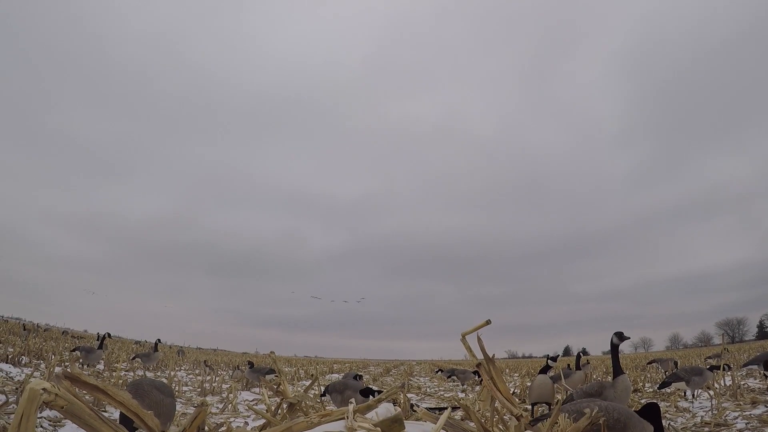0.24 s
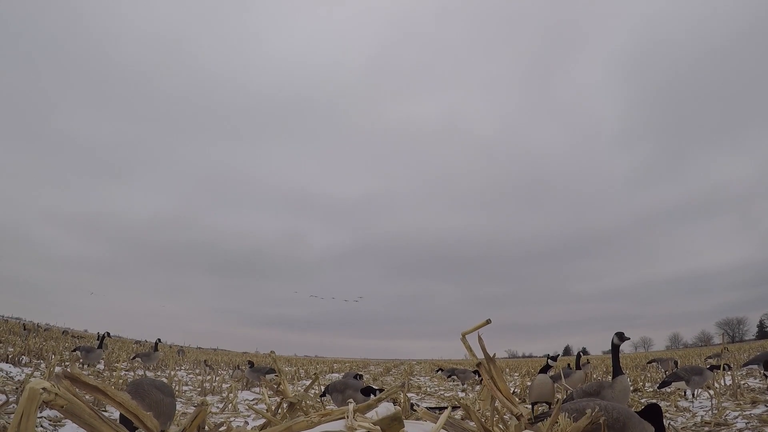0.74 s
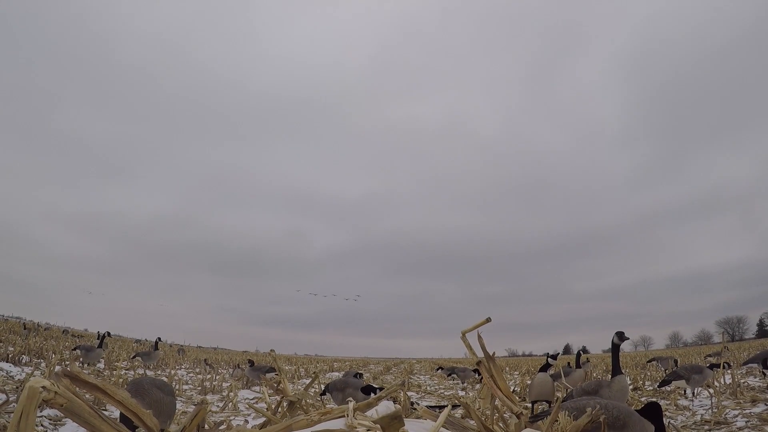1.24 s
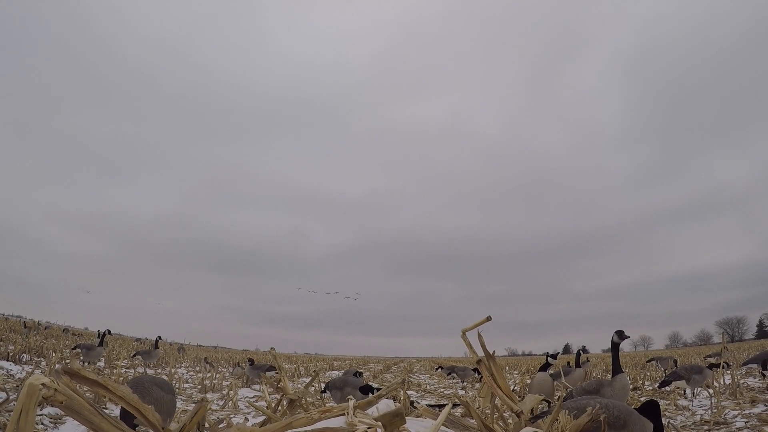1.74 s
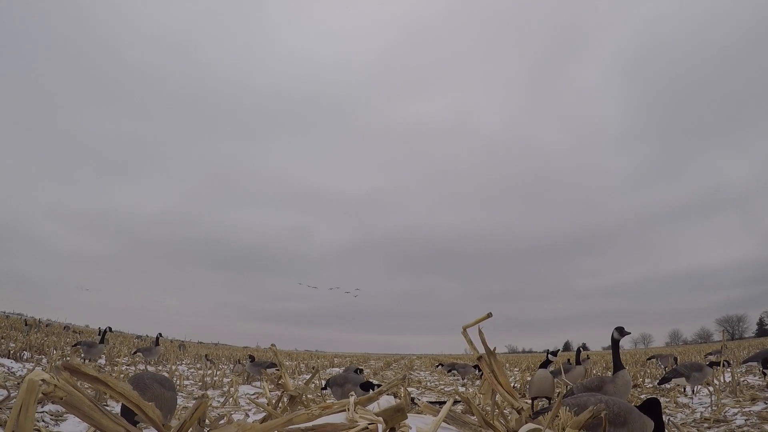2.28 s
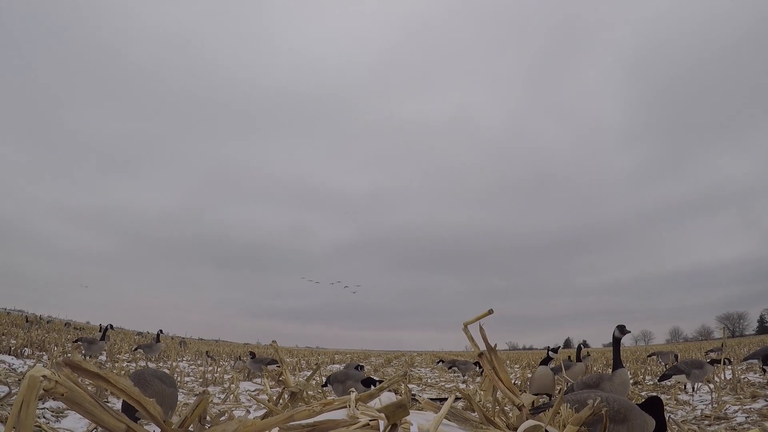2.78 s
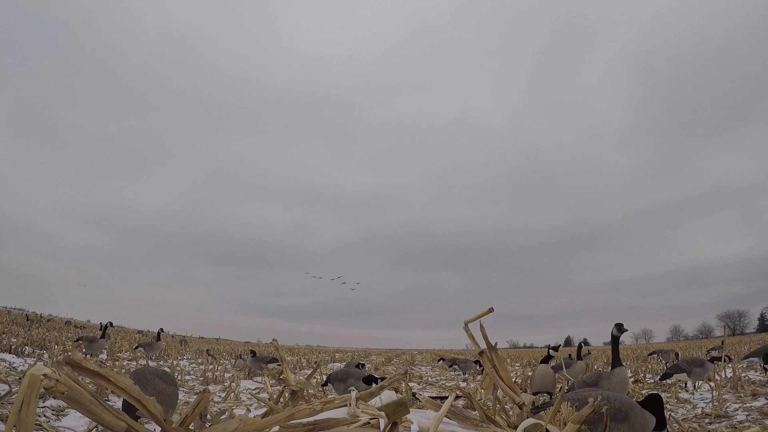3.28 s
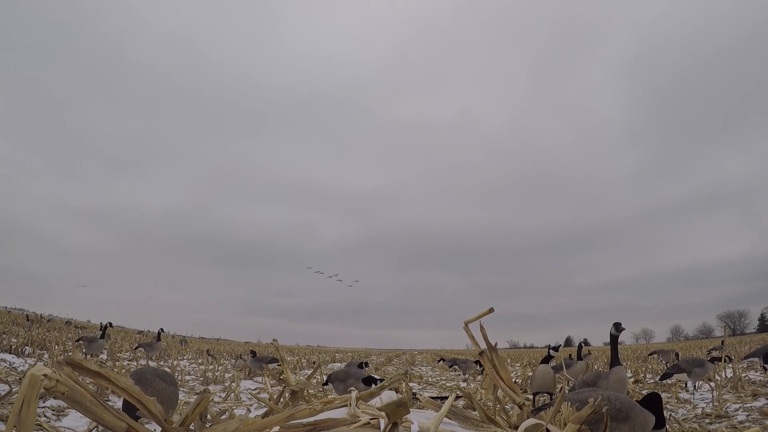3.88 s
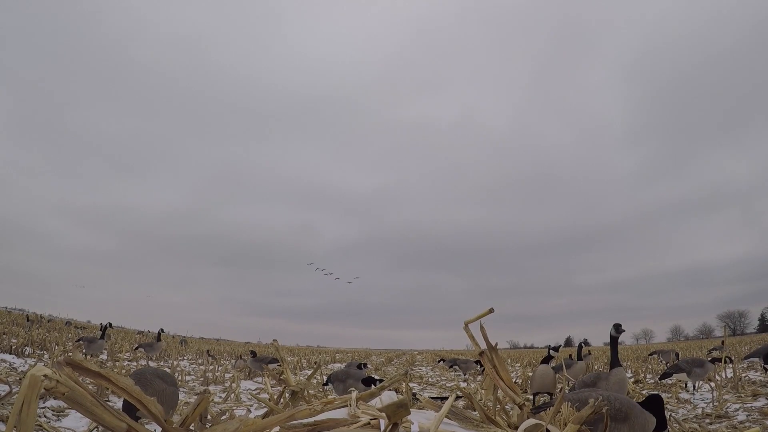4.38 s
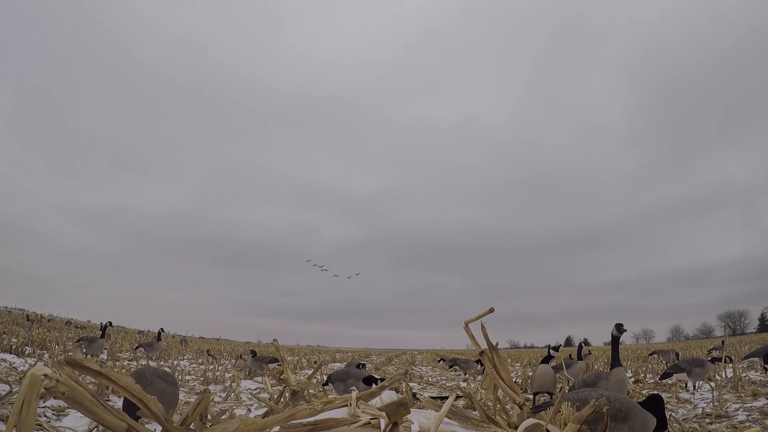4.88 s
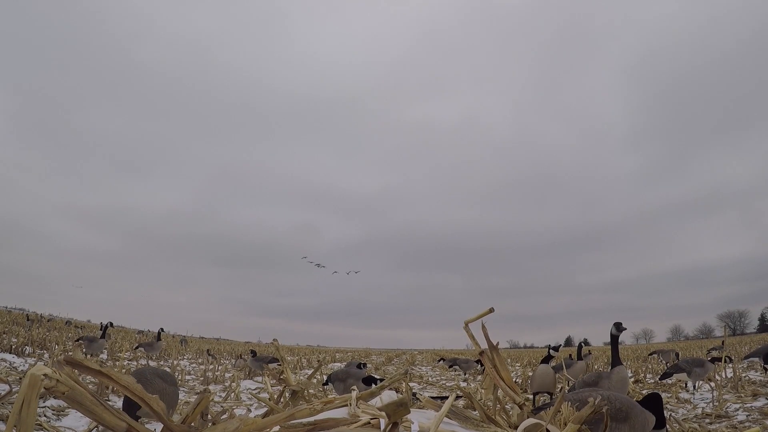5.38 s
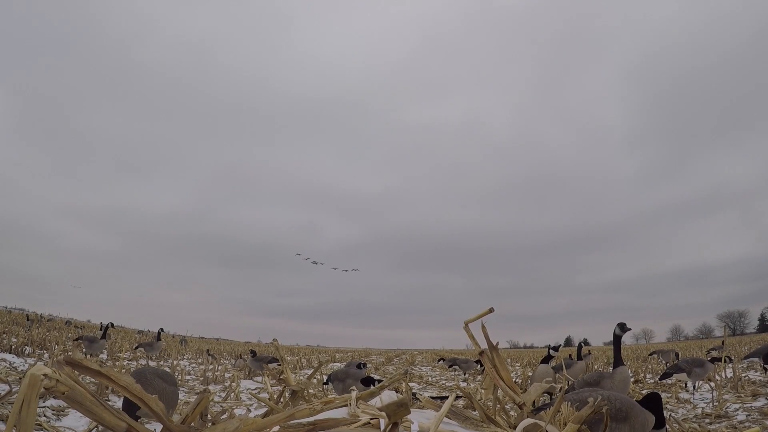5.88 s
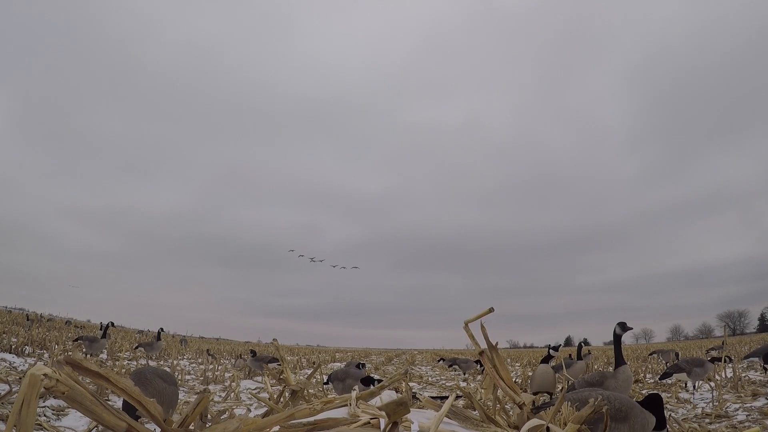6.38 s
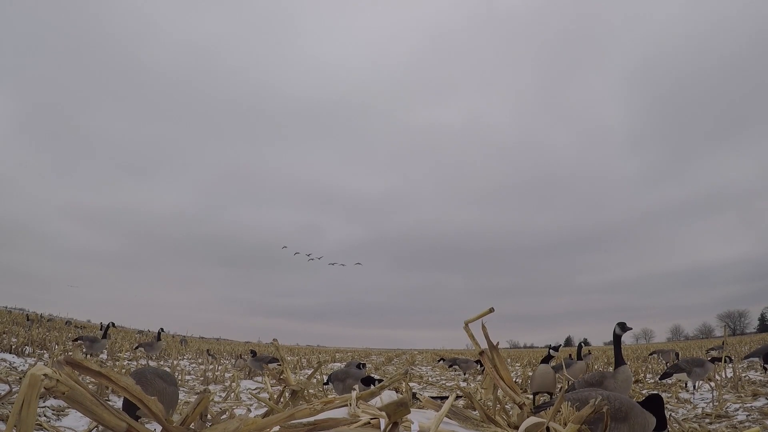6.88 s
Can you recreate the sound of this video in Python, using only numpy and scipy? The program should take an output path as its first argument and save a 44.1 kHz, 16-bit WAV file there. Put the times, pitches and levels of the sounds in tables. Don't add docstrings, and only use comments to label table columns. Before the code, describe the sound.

Gusty wind rumbles on a small microphone while two geese honk in turns across an open field, the wind swelling to a heavy roar.

```python
import sys
import numpy as np
from scipy import signal
from scipy.fft import rfft, irfft, next_fast_len
from scipy.io import wavfile
from scipy.ndimage import uniform_filter1d, map_coordinates

SR = 44100
rng = np.random.default_rng(int(sys.argv[2]) if len(sys.argv) > 2 else 0)


def transcribe(signal):
    frames = np.atleast_2d(signal).T
    limited = np.clip(frames, -1, 1)
    pcm = np.round(limited * 32767).astype(np.int16)
    wavfile.write(sys.argv[1], SR, pcm)


def rack_gain(trim_db):
    fader = np.asarray(trim_db, float)
    return 10 ** (fader / 20)


N = 314419
T = np.arange(N) / SR

# spectra [f/Hz, density/dB], each with its level/dB
PAIR_MID_NOISE, PAIR_MID_DB = [(190, -6), (330, 2.5), (375, -1), (482, -3), (801, -4.5), (867, -4),
                               (1060, -6), (1390, -8.5), (1560, -9), (2840, -15), (5520, -18), (7700, -15),
                               (14500, -26)], -47.5
PAIR_SIDE_NOISE, PAIR_SIDE_DB = [(190, -28), (330, 1.5), (406, -20), (461, -3), (594, -8), (856, -7),
                                 (927, -7.5), (4190, -33), (6980, -25), (13200, -36.5), (14700, -62)], -41.5
PORT_NOISE, PORT_DB = [(220, -29), (380, -8), (701, -6), (895, -6.5), (1420, -7.5), (2240, -13),
                       (2860, -20.5), (5700, -16.5), (7170, -17.5), (9160, -11), (11700, -18), (14700, -31)], -32.5
# [t/s, level/dB]
PAIR_FADE = [(4.25, -9), (4.45, -12), (4.6, -18.5), (4.8, -23), (4.95, -22.5), (5.02, -55)]
PORT_FADE = [(4.15, -50), (4.3, -36), (4.45, -28), (4.65, -22.5), (4.9, -22.5)]

# [f/Hz, density/dB]
PAIR_EDDIES = [(8.8, -55), (15, -6.5), (65, 4), (123, 0), (181, -9), (238, -14), (476, -37.5), (625, -40),
               (700, -47), (910, -60), (1540, -120)]
PORT_EDDIES = [(8.8, -63), (15, -4.5), (38, 1.5), (83, -4), (141, -13.5), (213, -21.5), (454, -45.5),
               (529, -49.5), (650, -55.5), (900, -57), (1170, -82.5), (1980, -120)]
# [t/s, rumble level/dB, left minus right/dB]
PAIR_WIND = [(0.0, -31, 0), (.1, -40, 0.5), (0.55, -31.5, 7.5), (0.82, -37, 2.5), (1.25, -30, -3),
             (1.41, -36.5, 2.5), (2.52, -40.5, 0.5), (4.26, -34, 8.0), (4.4, -25, 6)]
# [t/s, rumble level/dB, bite over rumble/dB]
PORT_WIND = [(4.2, -32, -12), (4.63, -16, -17), (5.19, -15, -19), (5.41, -19.5, -12.5),
             (5.52, -16.5, -34.5), (6.07, -17.5, -16), (6.24, -15.5, -27.5), (6.58, -16.5, -19),
             (7.13, -16, -20.5)]
# [t/s, level/dB, length/s, left minus right/dB]
PUFFS = [(0.163, -33.0, 0.04, 9.0), (0.224, -32.5, 0.048, 0.0), (0.267, -33.0, 0.033, 1.0),
         (0.33, -31.5, 0.035, 4.0), (0.386, -25.0, 0.05, 12.0), (0.43, -26.0, 0.038, 7.0),
         (0.515, -32.0, 0.0416, 3.0), (0.599, -22.0, 0.052, 9.0), (0.747, -24.5, 0.099, 9.0),
         (0.892, -26.0, 0.043, 12.0), (0.999, -25.5, 0.055, 8.0), (1.115, -22.5, 0.078, 8.0),
         (1.199, -24.5, 0.052, -3.0), (1.268, -25.0, 0.03, 2.0), (1.395, -21.5, 0.064, 12.0),
         (1.546, -29.0, 0.039, 11.0), (1.656, -28.5, 0.1, 14.0), (1.823, -26.5, 0.05, 11.0),
         (1.883, -29.5, 0.035, 7.0), (1.988, -34.5, 0.069, 3.0), (2.053, -34.0, 0.037, 9.5),
         (2.139, -33.5, 0.04, 6.0), (2.237, -34.5, 0.043, 10.0), (2.317, -32.5, 0.1, 8.0),
         (2.586, -32, 0.048, 6.0), (2.729, -30.0, 0.075, -1.0), (2.813, -28.5, 0.05, 12.0),
         (2.908, -33.5, 0.049, 4.0), (3.03, -29.5, 0.11, 10.0), (3.139, -38.0, 0.035, 11.5),
         (3.213, -37.0, 0.049, -0.5), (3.28, -37.5, 0.032, 6), (3.364, -26.5, 0.052, 18.0),
         (3.446, -31.0, 0.031, 12), (3.574, -33, 0.12, 6.0), (3.664, -33, 0.059, 16.0),
         (3.817, -35, 0.048, 6.0), (3.932, -29.5, 0.099, 8), (4.016, -29.0, 0.091, 12.5),
         (4.119, -30, 0.033, 2)]
# [t/s, level/dB, length/s, left minus right/dB]
PUFF_BITES = [(0.049, -42.5, 0.028, 10.0), (0.168, -41.5, 0.035, 9.0), (0.306, -35.0, 0.048, 8.0),
              (0.374, -30.5, 0.027, 15.0), (0.421, -30.5, 0.02, 13.0), (0.459, -28.5, 0.04, 12.0),
              (0.507, -29.0, 0.031, 13.0), (0.596, -27.0, 0.0897, 18.0), (0.698, -28.0, 0.031, 11.0),
              (0.759, -23.5, 0.032, 12.0), (0.882, -35.0, 0.058, 12.0), (1.004, -30.5, 0.04, 8.0),
              (1.048, -25.5, 0.031, 14.0), (1.103, -27.0, 0.039, 6.0), (1.23, -25.5, 0.03, -6.0),
              (1.392, -28.5, 0.038, 10.0), (1.499, -41.5, 0.027, 12.0), (1.564, -37.0, 0.033, 4.0),
              (1.613, -35.0, 0.034, 6.0), (1.775, -39.5, 0.028, 13.0), (1.824, -37.0, 0.033, 15.0),
              (1.885, -40.5, 0.067, 3.0), (1.989, -38.0, 0.03, 12.5), (2.08, -46.0, 0.045, -8.0),
              (2.145, -47.5, 0.026, 3.5), (2.228, -48, 0.025, 3.0), (2.309, -41.0, 0.056, 9.0),
              (2.369, -46.5, 0.026, 3.0), (2.498, -45.0, 0.053, -2.5), (2.62, -45.0, 0.033, -3.0),
              (2.744, -35.0, 0.08, 5.0), (2.844, -42.0, 0.039, 12), (2.897, -46, 0.022, -7.0),
              (2.97, -32.0, 0.023, -13.5), (3.034, -37.5, 0.03, 13.5), (3.39, -36, 0.068, 5.0),
              (3.448, -39, 0.028, 8.5), (3.506, -38.5, 0.029, 5.0), (3.566, -42.0, 0.054, 4.0),
              (3.748, -45.5, 0.028, 3.5), (3.891, -32.0, 0.039, -5.5), (4.003, -36, 0.031, 16.5),
              (4.091, -41.5, 0.033, 0.5), (4.156, -37.5, 0.033, 7.5), (4.289, -29, 0.025, 4)]
# [t/s, level/dB, length/s]
BLASTS = [(4.393, -16.0, 0.043), (4.459, -15.5, 0.059), (4.557, -16.0, 0.036), (4.633, -12.0, 0.054),
          (4.783, -11.0, 0.085), (4.88, -12.5, 0.033), (4.929, -13, 0.026), (4.992, -13, 0.091),
          (5.161, -11.0, 0.07), (5.264, -13.5, 0.03), (5.305, -13.5, 0.027), (5.37, -12.0, 0.071),
          (5.465, -21.5, 0.029), (5.522, -21.5, 0.025), (5.592, -16.0, 0.052), (5.753, -15, 0.042),
          (5.853, -22.5, 0.023), (5.904, -19.5, 0.023), (6.006, -12.5, 0.067), (6.118, -11.0, 0.047),
          (6.188, -11, 0.0595), (6.289, -11.0, 0.047), (6.39, -11.5, 0.074), (6.535, -9, 0.044),
          (6.611, -13.5, 0.027), (6.648, -13.0, 0.032), (6.705, -11.0, 0.14), (6.803, -16, 0.019),
          (6.9, -11.5, 0.11), (7, -13, 0.024), (7.085, -11.5, 0.076)]
# [t/s, level/dB, length/s]
BLAST_BITES = [(4.402, -24.0, 0.041), (4.457, -33.0, 0.027), (4.536, -31.0, 0.028), (4.575, -30, 0.02),
               (4.618, -26.5, 0.018), (4.655, -20.5, 0.027), (4.776, -24.0, 0.022), (4.823, -20.0, 0.062),
               (4.908, -30, 0.035), (4.966, -21, 0.021), (4.996, -22, 0.02), (5.035, -19.5, 0.045),
               (5.117, -21.5, 0.024), (5.127, -24.5, 0.025), (5.181, -24.5, 0.066), (5.314, -25, 0.022),
               (5.341, -24.5, 0.059), (5.38, -25.5, 0.024), (5.434, -23.5, 0.028), (5.493, -48.5, 0.023),
               (5.522, -46.5, 0.021), (5.6, -38.5, 0.017), (5.634, -37.0, 0.021), (5.669, -33, 0.024),
               (5.746, -30.5, 0.028), (5.861, -37, 0.022), (5.938, -32.5, 0.03), (6, -22.0, 0.023),
               (6.039, -19.5, 0.037), (6.125, -22.5, 0.02414), (6.202, -21.5, 0.024), (6.292, -27.5, 0.03),
               (6.408, -24, 0.026), (6.532, -18, 0.031), (6.578, -27.5, 0.017), (6.607, -28, 0.024),
               (6.657, -30, 0.022), (6.706, -22.0, 0.048), (6.781, -24, 0.052), (6.896, -25.5, 0.048),
               (6.935, -25, 0.023), (6.992, -19.5, 0.026), (7.059, -23.5, 0.043), (7.106, -25.5, 0.024)]
BREEZE_DB, BREEZE_BITE_DB, GALE_DB, GALE_BITE_DB = -3.5, -14, -2.5, -1.5
BELL, BITE_BELL = .45, .48
BITE_HZ = 148.2

# [t/s, peak level/dB, left minus right/dB, width/ms]
THUMPS = [(0.698, -27, 12, 0.81), (0.716, -26.5, 19, 0.48), (0.754, -26, 21, 0.38),
          (0.908, -37, -16.5, 0.44), (0.978, -32.5, 23, 0.51), (1.038, -30, 18.5, 0.44),
          (1.077, -32, -24, 0.49), (1.203, -27, -16, 0.36), (1.227, -31, -28, 0.57),
          (1.377, -40, -18.5, 0.43), (2.719, -43, 2, 0.18), (2.961, -33, -18, 0.4),
          (4.527, -23.5, -1, 0.27), (4.636, -26, 5, 0.27), (4.651, -17, 3.5, 0.43), (4.675, -30, 6, 0.32),
          (4.756, -23, 2, 0.37), (4.778, -13, 0.5, 0.37), (4.812, -12, -0.5, 0.28), (4.826, -15, 2, 0.29),
          (4.964, -28, 0.5, 0.19), (5.111, -23.5, 0.0, 0.31), (6.027, -26, 0.0, 0.48),
          (6.135, -27.5, -1, 0.35), (6.4, -34, -0.5, 0.56), (6.533, -24, 0, 0.25), (6.684, -24, -3, 0.34),
          (6.706, -20.5, -0.5, 0.36), (6.733, -21, -0.5, 0.37), (6.756, -23, 0, 0.34),
          (6.886, -32.5, 0.0, 0.33), (6.901, -25, 0, 0.35), (6.935, -24.5, 0, 0.31), (6.986, -31, -1, 0.35)]
# [t/s, peak level/dB, f/Hz, left minus right/dB]
TICKS = [(0.2733, -53, 7430, -1.5), (1.44, -49, 7390, -19.5), (1.672, -52.5, 7020, -5),
         (1.688, -41, 1197, -1), (2.0753, -50.5, 7310, -18), (2.1784, -51, 7770, -23),
         (2.369, -50.5, 7330, -9), (2.4298, -50, 7300, -8), (3.214, -50, 7300, -13.5),
         (4.6987, -47, 6307, 0.0), (4.805, -47, 2803, 2)]
SMEAR_DB, SMEAR_S = -9.5, 0.012

# [start t/s, flip t/s, note f/Hz, groan level/dB, note level/dB]
RIGHT_CALLS = [(0.292, 0.352, 711, -23.5, -32), (3.351, 3.403, 670, -22, -33),
               (3.848, 3.909, 664, -23.5, -33), (4.371, 4.419, 669.5, -26, -40),
               (6.634, 6.682, 611, -28.5, -37)]
RIGHT_NOTE_S = [0.069, 0.056, .063, 0.051, 0.03105]
RIGHT_HARMONICS = [15, 4, -3.5, -28, -33, -23.5, -50, -35, -26]

# [t/s of the lock, groan length/s,
# note length/s, level/dB, growl f/Hz, a quarter of the note]
AHEAD_CALLS = [(0.145, 0.021, 0.047, -66, 184), (0.407, 0.0065, 0.078, -54.5, 207.6),
               (.488, 0.021, 0.061, -48, 193.5), (1.089, 0.069, 0.049, -50, 192),
               (1.478, 0.082, 0.058, -53, 214), (1.835, 0.062, 0.1, -47.5, 199.1),
               (2.105, 0.047, 0.19, -62, 190), (2.55, 0.14, 0.035, -55, 193.2),
               (2.795, 0.071, 0.049, -50, 201.9), (3.263, 0.074, 0.07, -44.5, 201.7),
               (3.801, 0.12, 0.07, -45.5, 199.5), (4.035, 0.074, 0.066, -52, 204.2),
               (4.389, 0.11, 0.079, -45.5, 201.6), (4.763, 0.041, 0.087, -49, 198.6),
               (5.075, 0.032, 0.078, -51, 199), (5.14, 0.0065, 0.059, -54, 181),
               (5.624, 0.074, 0.07, -49, 197.2), (6.356, 0.017, 0.049, -54.5, 203.9),
               (6.71, .025, 0.0755, -51, 199.2)]
# [growl left in the note 0-1, treble over level/dB, low ring/dB, top ring/dB]
VOICE = [(.1, -26, -18, -20), (0.8, -13, -1.5, -22), (0.5, -15.5, -7.5, -9), (1, -14.5, -2.5, -5),
         (0.59, -23, -7.5, -6), (0.64, -12, -7.5, -5.5), (0.12, -26, -14.5, -20), (0.99, -20, -3, 0),
         (1, -11.5, -6, -9), (0.69, -8, -10.5, 5.5), (0.76, -15, -8, -4), (0.78, -18, -1, -6),
         (0.15, -13, -4, 0), (1, -2, 0, -5), (1, -4, -2.5, -2), (0.8, -5, -24, -6), (0.96, -7.5, -2.5, -3),
         (1, -8, -1.5, -12), (1, -6.5, 1.5, -5)]
# [groan over usual/dB, sag over usual/1, growl lost midway/1, throat size/1]
PHRASE = [(-1, .3, .01, 1.07), (5, 1.84, .01, 1.01), (3.5, 0.92, .01, 1.036), (-2.5, 0.773, .01, 1.02),
          (3.5, 1.51, 0.75, 0.995), (-3, .8, .01, 1.02), (2.5, 0.93, .01, 1.05), (0.5, 1.4, .01, 1.03),
          (-0.5, 1.63, 0.095, 1.02), (0, 0.944, 0.087, 1.036), (-4, 1.22, 0.091, 1.01),
          (-0.5, 1.372, 0.099, 1.005), (-2, 0.85, 0.45, 1.06), (0, 0.7, 1, 1.006), (1, 1.32, 0.59, 1.02),
          (0, 1.5, 0.099, 1.02), (-1, 1.2, 0.26, 1), (0.5, 1.34, .1, 1.007), (2, 1.03, 0.19, 1.026)]
UPPER_DB = [-10, -6, -3, 2, 0.5, -4, -6, -10.5, -11, 1.5, -1, -5, -3, -6.5, 2, -1, 2, -4, 11.5]
GROAN_DROP = [.05, 0.058, 0.089, 0.0306, 0.0494, .11, 0.1014, .09, 0.0302, 0.1, 0.08, .04, .12, .08, .08,
              .05, .1, 0.0813, 0.0798]
# [f/Hz, width/Hz, level/dB]
THROAT = [(1530, 273, 5.5), (2282, 220, -8.5)]
WINDPIPE = [(626, 640, -7), (803, 230, 8.5)]
BILL = [(2900, 1794, -7), (4242, 800, 2)]
BILL_TIP = [(5940, 1650, 0)]
RASP = [(1460, 700, -1)]
GROAN_START_DB, GROAN_END_DB = -15, -2.5
GROAN_CLIMB, NOTE_RISE = .05, 0.01394
NOTE_SAG, SAG_CURVE = 0.119, 2.88
RELEASE_DB, RELEASE_CURVE = -12.5, 3.1
DRIFT_PER_S = 0.245
SWELL_DB, SWELL_SHARE = -1, 0.24
GROAN_THROAT, NOTE_THROAT, THROAT_LAG = 0.72, 0.919, 0.048
TAIL_S = 0.0072


def curve(table):
    s, *columns = np.transpose(table)
    return [np.interp(T, s, c) for c in columns]


def ramp(t, at, length):
    return np.sin(np.pi / 2 * np.clip((t - at) / length, 0, 1)) ** 2


def pan(x, db):
    return np.outer(rack_gain([db / 2, -db / 2]), x)


def walk(rate, size=N):
    k = max(int(SR / rate), 1)
    held = 1.3 * np.repeat(rng.standard_normal(size // k + 1), k)
    return uniform_filter1d(uniform_filter1d(held, k), k)[:size]


def coloured(spectrum, size=N):
    hz, db = np.transpose(spectrum)
    n = 2 * next_fast_len(size // 2 + 1)
    log_f = np.log(np.arange(1, n // 2 + 2) * SR / n)
    gain = rack_gain(np.interp(log_f, np.log(hz), db, -120, -120))
    x = irfft(rfft(rng.standard_normal(n)) * gain, n)[:size]
    return x / x.std()


def even(x, seconds):
    k = int(seconds * SR)
    power = uniform_filter1d(uniform_filter1d(x ** 2, size=k), size=k)
    x = x / power ** .45
    return x / x.std()


def rings(hz, modes):
    return sum((-1) ** k * rack_gain(db) / (1 + 2j * (hz - f) / w) ** 2 for k, (f, w, db) in enumerate(modes))


def field_noise():
    swell = rack_gain(.3 * walk(2))
    mid = rack_gain(PAIR_MID_DB) * coloured(PAIR_MID_NOISE)
    side = rack_gain(PAIR_SIDE_DB) * coloured(PAIR_SIDE_NOISE)
    return swell * np.array([rack_gain(-1.0) * (mid + side), mid - side])


def gusting(db, pan_db, gusts, bell):
    def split(db, pan_db):
        return rack_gain(2 * db) / (1 + rack_gain(np.multiply.outer([-2, 2], pan_db)))

    power = split(db, pan_db)
    for s, gust_db, length, *gust_pan_db in gusts:
        span = slice(max(int((s - 2 * length) * SR), 0), int((s + 2 * length) * SR))
        shape = np.exp(-((T[span] - s) / (bell * length)) ** 2)
        power[:, span] += np.outer(split(gust_db, sum(gust_pan_db)), shape)
    return 10 * np.log10(power)


def wind(spectrum, db, bite_db, usual_db, gusty):
    extra_bite = np.minimum(bite_db - db - usual_db, 9)
    speed = np.clip(2 ** (extra_bite / 45 + gusty * walk(30)), .5, 2)
    row = map_coordinates(coloured(spectrum, size=2 * N), [np.cumsum(speed)], order=1)
    big = signal.sosfilt(signal.butter(4, BITE_HZ, "low", fs=SR, output="sos"), row)
    small = signal.sosfilt(signal.butter(4, BITE_HZ, "high", fs=SR, output="sos"), row)
    return rack_gain(db) * even(big, 0.038) + rack_gain(bite_db) * even(small, 0.015)


def breeze_on_pair():
    db, pan_db = curve(PAIR_WIND)
    rumbles = gusting(db + BREEZE_DB, pan_db, PUFFS, BELL)
    bites = gusting(db + BREEZE_BITE_DB, pan_db, PUFF_BITES, BITE_BELL)
    gusts = np.array([wind(PAIR_EDDIES, rumble_db + 11.0, bite_db + 8.5, -9.5, gusty=.12)
                      for rumble_db, bite_db in zip(rumbles, bites)])
    return gusts - 0.0047 * np.roll(gusts[::-1], 11, axis=1)


def gale_on_port():
    db, bite_db = curve(PORT_WIND)
    bite_db = gusting(db + bite_db + GALE_BITE_DB, 0 * T, BLAST_BITES, BITE_BELL)[0]
    db = gusting(db + GALE_DB, 0 * T, BLASTS, BELL)[0]
    return wind(PORT_EDDIES, db + 3.0, bite_db + 1.12, -14.5, gusty=.1) * ramp(T, 4.2, 0.066)


def thumps():
    out = np.zeros((2, N))
    for (s, db, pan_db, ms), turn in zip(THUMPS, 2 * np.pi * rng.random(len(THUMPS))):
        u = np.arange(-600, 600) / SR / (ms / 1000)
        swings = 1.25 if s < PAIR_FADE[0][0] else 1.8
        pulse = np.cos(0.5 * u + turn) * np.exp(-(u / swings) ** 2 / 4)
        at = int((s + 0.00397) * SR)
        out[:, at - 600:at + 600] += pan(rack_gain(db + 4.0) * pulse, pan_db)
    return out


def stalks():
    out, t = np.zeros((2, N)), T[:300]
    for s, db, hz, pan_db in TICKS:
        at = int(s * SR)
        ring = np.exp(-t / 0.00059) * np.sin(2 * np.pi * hz * t)
        out[:, at:at + 300] += pan(rack_gain(db + 6.0) * ring, pan_db)
    return out


def goose_right():
    out, order = np.zeros(N), np.arange(1, 37)[:, None]
    harmonic = order[:9]
    for (start, flip, note_hz, groan_db, note_db), note_s in zip(RIGHT_CALLS, RIGHT_NOTE_S):
        end = flip + note_s
        span = slice(int(start * SR), int(end * SR))
        t = T[span]
        climb = np.clip((t - start) / (flip - start), 0, 1)
        hz = (158 + 16 * climb ** .4) * (1 + .035 * walk(250, size=len(t)))
        parts = rings(order * hz, [(840 + 190 * climb ** 3, 185, 0), (1950, 250, -42 + 12 * climb)])
        groan = (parts * np.exp(2j * np.pi * order * np.cumsum(hz) / SR)).sum(axis=0).real
        groan_edges = ramp(t, start - .002, .011) * (1 - ramp(t, flip - .003, .008))
        groan *= groan_edges * rack_gain(1.5 * climb + 1.6 * walk(350, size=len(t))) / groan.std()

        sag = np.clip((t - end + .03) / .03, 0, 1)
        hz = note_hz * (1 - .13 * (1 - ramp(t, flip - .01, .02)) - .25 * sag ** 1.4)
        lean_db = -30 * sag ** 1.4 * (harmonic != 2) - 12 * sag * (harmonic > 2)
        levels = rack_gain(np.array(RIGHT_HARMONICS)[:, None] + lean_db)
        note = (levels * np.sin(2 * np.pi * harmonic * np.cumsum(hz) / SR)).sum(axis=0)
        note *= np.sqrt(2) * ramp(t, flip - .009, 0.015) * (1 - ramp(t, end - TAIL_S, TAIL_S))
        out[span] += rack_gain(groan_db) * groan + rack_gain(note_db) * note
    return out


def goose_ahead():
    out, order = np.zeros(N), np.arange(2, 40)[:, None]
    scatter = np.exp(1.3j * rng.standard_normal(order.shape))
    for call, voice, phrase, upper_db, drop in zip(AHEAD_CALLS, VOICE, PHRASE, UPPER_DB, GROAN_DROP):
        lock, groan_s, note_s, call_db, hz = call
        growl, treble_db, low_db, top_db = voice
        groan_db, sag, lost, throat_size = phrase
        span = slice(int((lock - groan_s) * SR), int((lock + note_s) * SR))
        t = T[span]
        built = np.clip(1 + (t - lock) / groan_s, 0, 1)
        spent = np.clip((t - lock) / note_s, 0, 1)
        loose = 1 - ramp(t, lock - .006, 0.012)
        growl = growl * (1 - np.clip(lost, 0, 1) * ramp(spent, 0.29, 0.25))

        rise = GROAN_CLIMB * (1 - built) + NOTE_RISE * (1 - ramp(spent, 0, 0.387))
        drift = DRIFT_PER_S * (1 - growl) * note_s * spent
        hz = hz * (1 - rise - drift - sag * NOTE_SAG * spent ** SAG_CURVE)
        db = call_db + SWELL_DB * (1 - ramp(spent, 0, SWELL_SHARE)) + RELEASE_DB * spent ** RELEASE_CURVE
        db = db + loose * (groan_db + GROAN_START_DB + (GROAN_END_DB - GROAN_START_DB) * built)

        groan_size = (GROAN_THROAT + 2 * drop) * (1 - GROAN_CLIMB * (1 - built))
        opening = NOTE_THROAT - THROAT_LAG * (1 - ramp(spent, 0, 0.31))
        note_size = throat_size * opening * (hz / 195) ** 1.45
        size = groan_size * loose + note_size * (1 - loose)
        hz = hz * (1 - drop * loose + (0.0043 + 0.01468 * loose) * walk(124.5, size=len(t)))

        share = np.where(order % 4 == 0, 1, np.clip(growl + loose, 0, 1))
        lower_ring = rings(order * hz / size, THROAT[:1])
        upper_ring = rack_gain(upper_db - 10 * loose) * rings(order * hz / size, THROAT[1:])
        throat = share * (lower_ring - upper_ring + loose * scatter * rings(order * hz, RASP))
        uneven = rack_gain(1.2 * rng.standard_normal(order.shape))
        bill = rings(order * hz, BILL) + rack_gain(top_db) * rings(order * hz, BILL_TIP)
        bill = share * scatter * uneven * bill
        pipe = rack_gain(low_db + 36 * drop * loose) * share * rings(order * hz / size, WINDPIPE)

        turns = np.exp(2j * np.pi * order * np.cumsum(hz) / SR)
        low = ((throat - pipe) * turns).sum(axis=0).real / np.sqrt((abs(throat) ** 2).sum(axis=0) / 2)
        high = (bill * turns).sum(axis=0).real / np.sqrt((abs(bill) ** 2).sum(axis=0) / 2)
        high *= 1 + .6 * growl * walk(1800, size=len(t))
        breathy = 1 + (0.17 + 0.14 * loose) * walk(500, size=len(t))
        high *= ramp(t, lock - .03, 0.055) * (1 - ramp(t, t[-1] - .05, 0.078))
        high_db = treble_db + 4.0 - 0.5 * GROAN_END_DB * loose - 220 * np.clip(lock - t, 0, 1)
        edges = ramp(t, t[0], max(.015, 0.12 * (lock - t[0]))) * (1 - ramp(t, t[-1] - TAIL_S, TAIL_S))
        out[span] += edges * rack_gain(db) * breathy * (rack_gain(3.0) * low + rack_gain(high_db) * high)
    return out


def stubble_echo(x, smear):
    return x + rack_gain(-24.5) * np.roll(x, 800) + signal.oaconvolve(x, smear)[:N]


def scene():
    ahead, right = goose_ahead(), goose_right()
    smear = rng.standard_normal(6000) * np.exp(-T[:6000] / SMEAR_S)
    smear *= rack_gain(SMEAR_DB) / np.sqrt(SMEAR_S * SR / 2)
    ahead, right = stubble_echo(ahead, smear), stubble_echo(right, smear)
    (pair_gain,), (port_gain,) = rack_gain(curve(PAIR_FADE)), rack_gain(curve(PORT_FADE))

    shaded = np.roll(signal.sosfilt(signal.butter(2, 600, fs=SR, output="sos"), right), 5)
    pair = np.array([rack_gain(-6.5) * shaded, right]) + breeze_on_pair() + field_noise()

    bright = 5 * signal.lfilter(*signal.butter(2, 1800, "high", fs=SR), right)
    blast = gale_on_port()
    port = port_gain * (rack_gain(PORT_DB) * coloured(PORT_NOISE) + right + bright)
    ahead -= 9.7 * port_gain * signal.lfilter(*signal.iirpeak(3100, 2.2, fs=SR), ahead)
    return pair_gain * pair + port + blast + ahead + thumps() + stalks()


def top_cut(x):
    return signal.sosfilt(signal.butter(12, 14870, fs=SR, output="sos"), x)


def record(dry):
    limited = .85 * np.tanh(dry / .85)
    soft = signal.sosfilt(signal.butter(4, 13400, fs=SR, output="sos"), limited)
    soft = soft * (1 - .9 * ramp(T, 7.112, .018)) - .16 * ramp(T, 7.116, .012)
    return top_cut(soft)


dry = scene()
out = record(dry)
transcribe(out)
```